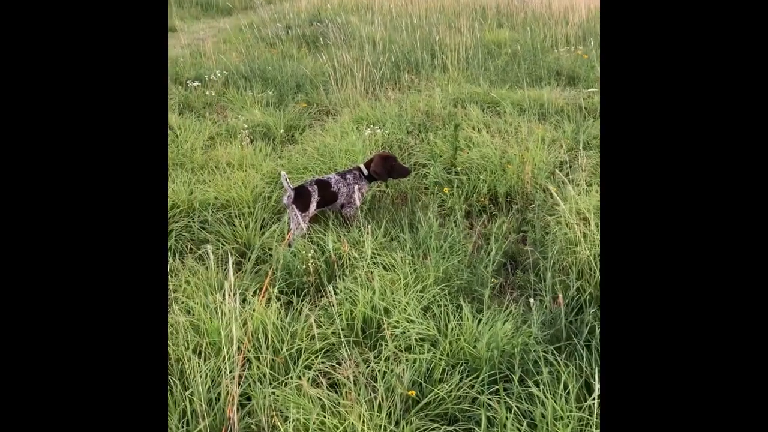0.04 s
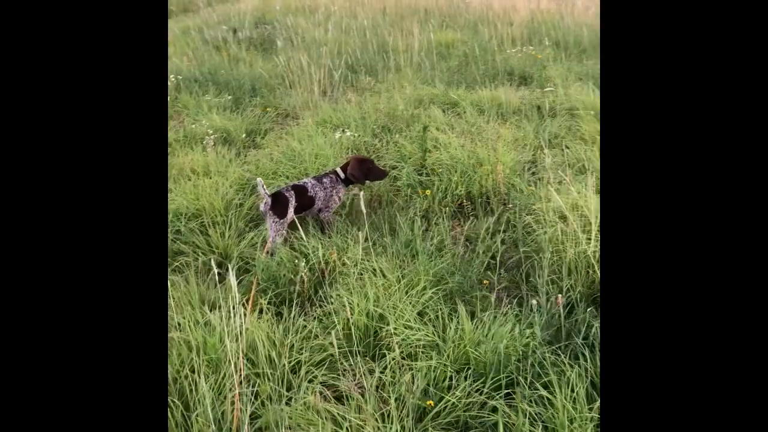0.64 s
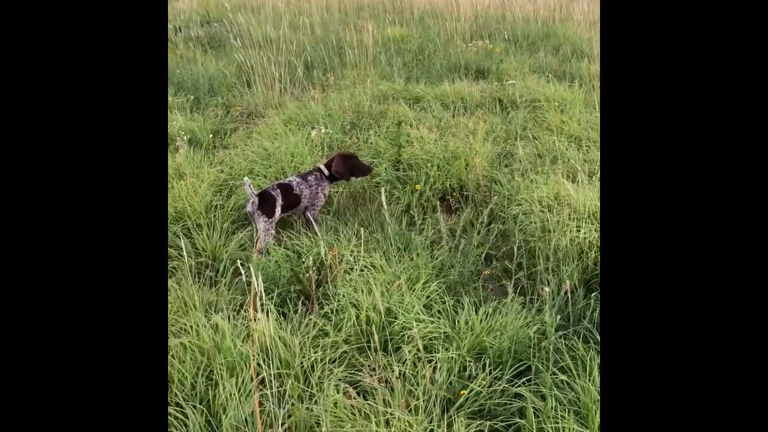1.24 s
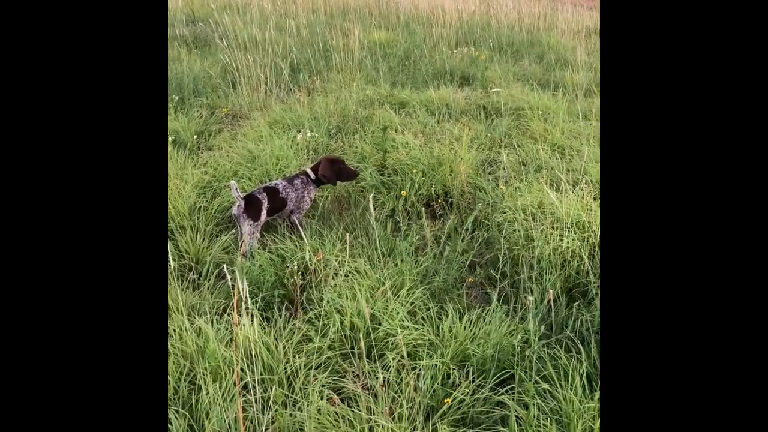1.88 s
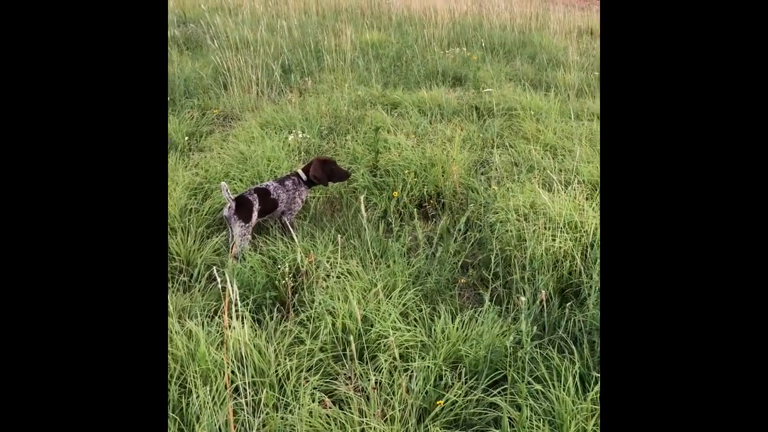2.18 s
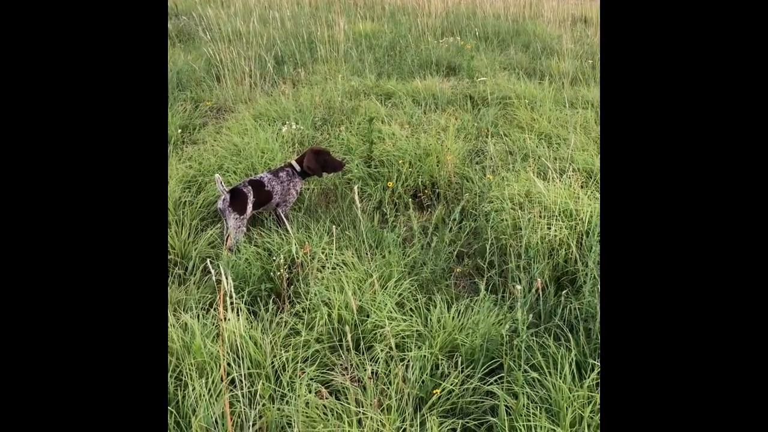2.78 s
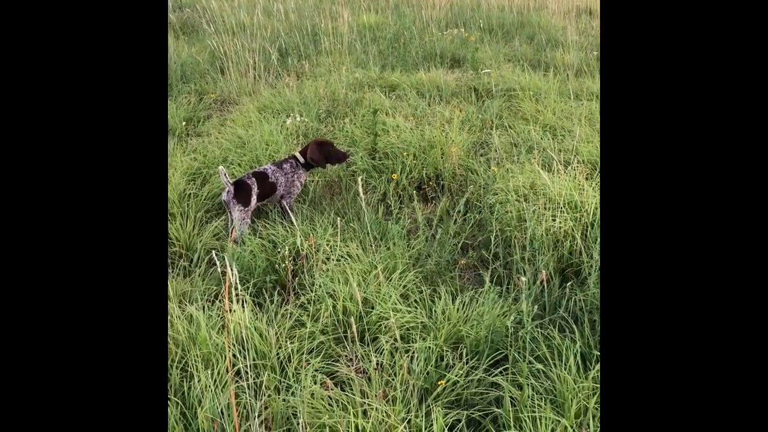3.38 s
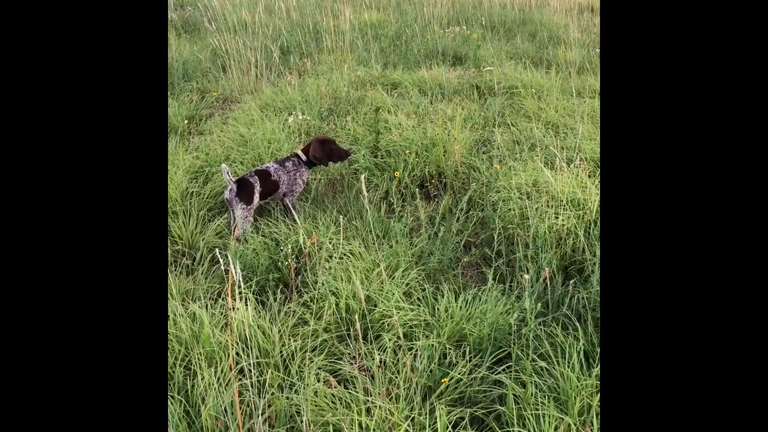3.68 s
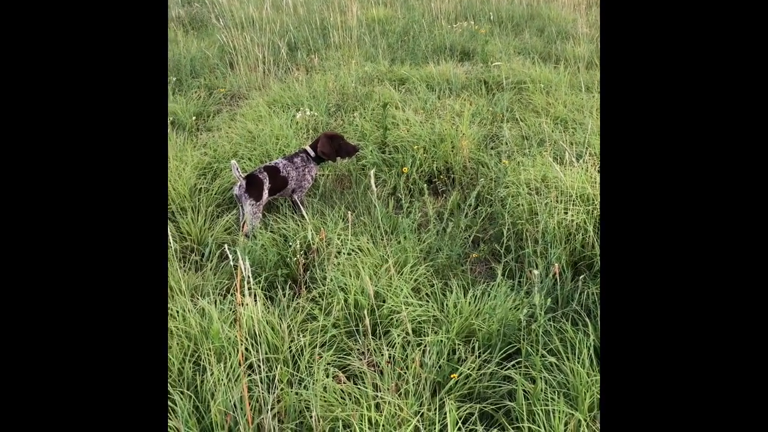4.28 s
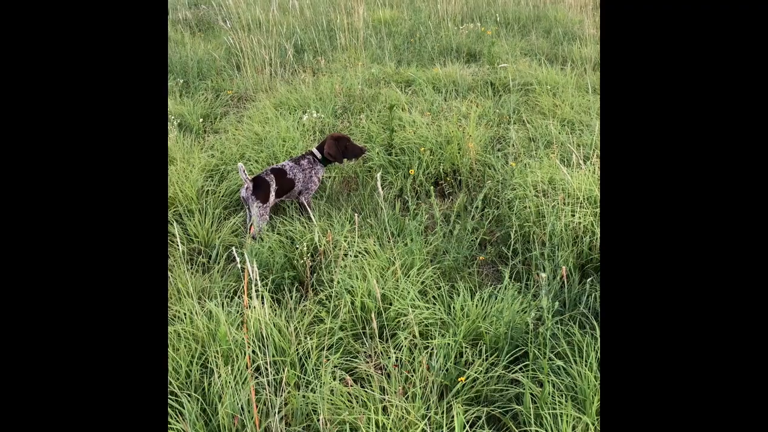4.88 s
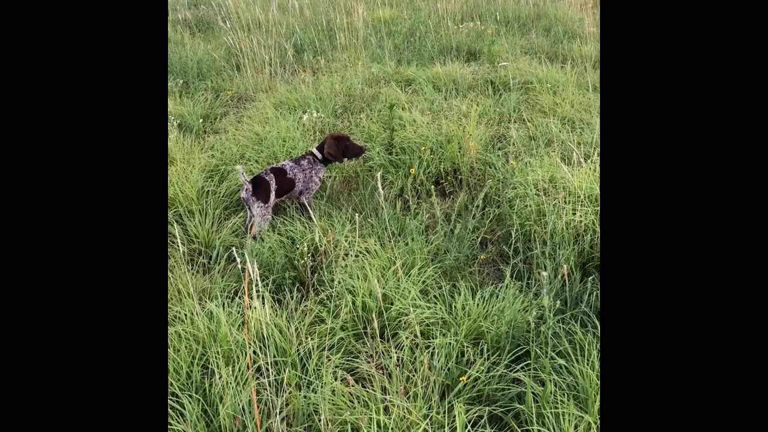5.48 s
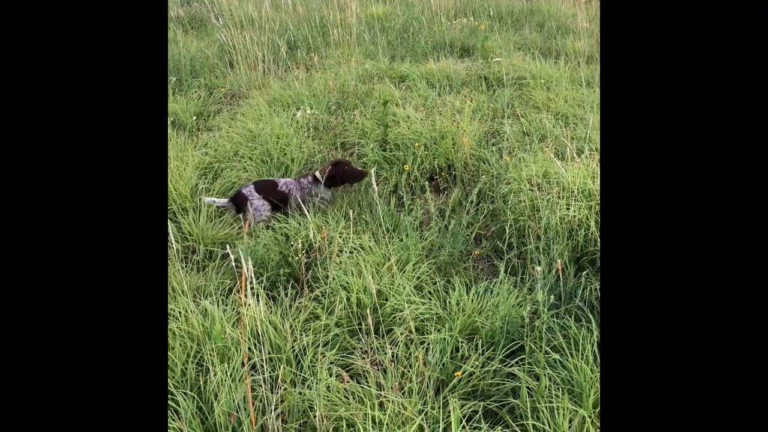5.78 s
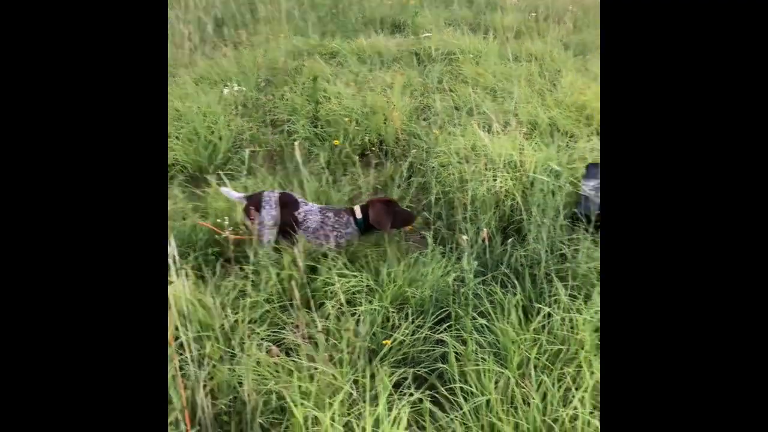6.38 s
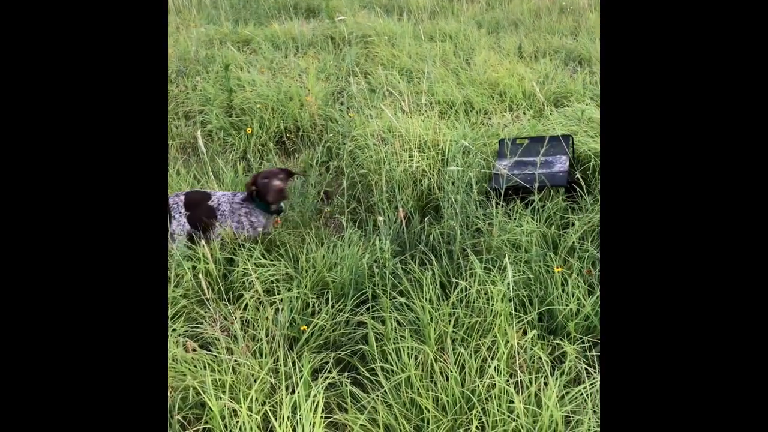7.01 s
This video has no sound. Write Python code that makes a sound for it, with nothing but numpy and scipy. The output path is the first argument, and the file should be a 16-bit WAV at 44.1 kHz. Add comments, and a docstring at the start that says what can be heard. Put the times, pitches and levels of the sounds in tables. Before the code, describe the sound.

Grass swishes softly and a few stems snap as a dog steps through an open meadow, then stops, leaving faint birdsong and a low, distant engine hum. Suddenly a metal launcher scrapes off its latch and bangs open, ringing briefly. Wing flaps follow, mixed with quicker rustling and a string of short, high dog whimpers and yips, until a single sharp pistol crack ends it with a brief hiss.

```python
"""A field of tall grass, with songbirds and an idling engine far off. A young pointer creeps in,
blades swishing and stems snapping. A spring launcher scrapes off its latch and slams open, its sheet
steel ringing; the thrown bird claps away on its wings, and the dog lunges through the grass with thin
whines that break into yips. At the very end a blank pistol cracks and the grass scatters it as hiss."""
import sys
import numpy as np
from scipy import signal
from scipy.fft import rfft, irfft, next_fast_len
from scipy.io import wavfile
from scipy.ndimage import map_coordinates

SR = 44100
rng = np.random.default_rng(int(sys.argv[2]) if len(sys.argv) > 2 else 0)


def generate_wav(signal):
    """Clip the signal to [-1, 1] and save it as 16-bit WAV at the path in sys.argv[1]."""
    frames = np.transpose(np.atleast_2d(signal))
    scaled = np.clip(frames, -1, 1) * 32767
    pcm = np.round(scaled).astype(np.int16)
    wavfile.write(sys.argv[1], SR, pcm)


N = 315125
T = np.arange(N) / SR

# hits of the launcher's latch, doors and frame: t/s, relative level/dB, t60/s, tilt/(dB per octave)
LAUNCHER_HITS = [(5.459, -57.5, 0.054, -6.5), (5.4951, -38.5, .07, -3.5), (5.519, -26.5, 0.081, 0),
                 (5.532, -23, 0.15, -1.5), (5.554, -25.5, 0.058, 2.5), (5.575, -32, 0.34, -0.5),
                 (5.620, -32.5, 0.062, 0.5), (5.6523, -11, 0.078, 2.14), (5.7243, -36.5, 0.098, -3.5),
                 (5.79, -33.5, 0.067, -0.5)]
# ringing modes of its sheet steel and frame: f/Hz, width/Hz, gain/dB
STEEL_MODES = [(1353, 24, -6), (1500, 16, -3), (1593, 13, 1), (1655, 15, 1), (1850, 30, -4),
               (1955, 30, -1.5), (2820, 27, -1.5), (3820, 26, 2), (3992, 22, 4), (4105, 20, 5),
               (5170, 30, 1.5), (5610, 22, 3), (6270, 28, -1.5), (7240, 32, 1), (7270, 35, 0),
               (7630, 30, 4.5), (7729, 22, -1), (8040, 35, -3), (9010, 40, 3), (9160, 35, 3),
               (9870, 35, 1.5), (11000, 35, 1.5), (11600, 40, -2), (12615, 32, 2), (14960, 40, 3),
               (14950, 40, 4), (15100, 55, 2)]
# tone of steel on steel and of the sliding latch: f/Hz, level/dB
CLANG_EQ = [(59, -41), (100, -12), (547, -13.5), (768, -14), (1330, -2.5), (1830, -4.5), (2690, -6),
            (3700, -3), (6700, -4), (7450, -2.5), (13200, -9.5), (15000, -9), (16000, -18.5)]
LATCH_EQ = [(500, -23), (1100, -11), (1900, 4.5), (2700, -10), (4200, -12), (7000, -22), (16000, -38)]

# tone of the pistol's blast, its bounce off the turf and its scatter from the grass: f/Hz, level/dB
BLAST_EQ = [(40, -21), (150, -16), (500, -1.5), (1900, -1), (4000, -4), (8000, -7), (11000, -12),
            (16000, -21)]
BOUNCE_EQ = [(40, 1), (100, 1.5), (220, -2.5), (500, -20), (1000, -25), (3000, -37), (16000, -53)]
SCATTER_EQ = [(100, -9), (1000, -5), (3300, 0), (6200, 1.5), (9000, -2.5), (12000, -13), (16000, -15)]

# the dog's whimpers: t/s, time to the break/s, start f/Hz, end f/Hz, yip f/Hz, whine level/dB,
# yip level/dB, yip t60/s, second partial/dB, third partial/dB, rasp/(0 to 1)
WHIMPERS = [(5.925, 0.039, 833, 815, 1040, -45.5, -32, 0.13, -2, 3, 0.42),
            (6.255, 0.048, 918, 958, 965, -30.5, -38, 0.12, -10.5, -21.5, 0.08),
            (6.503, 0.063, 800, 875, 940, -28, -33.5, 0.16, -10.5, -23.5, 0.24),
            (6.62, 0.11, 927, 1015, 888, -47.5, -37, 0.18, -18, -30, 0.33),
            (6.745, 0.0374, 927, 1010, 875, -49, -45, 0.24, -17, -18, 0.3),
            (6.911, 0.047, 854, 835, 938, -29, -33, 0.23, -17, -26, 0.87),
            (7.035, 0.046, 952, 1169, 954, -36.5, -37, 0.21, -5, -34, 0.75)]
# tone of the rasp in its voice: f/Hz, level/dB
RASP_EQ = [(500, -48), (800, 7), (1000, -3), (1800, 0), (2600, -1.5), (3000, -25), (5000, -28.5)]

# wing claps: t/s, relative level/dB, tilt/(dB per octave)
WINGBEATS = [(5.775, -38.5, 3), (5.830, -28, -1.5), (5.874, -38.5, -3), (5.94, -36.5, -2), (6.384, -40, -2),
             (6.499, -47.5, -1), (6.612, -40, -1), (6.728, -37, -0.5), (6.845, -43.5, -2)]
# tone of a clap: f/Hz, level/dB
CLAP_EQ = [(100, -7), (350, -4.5), (800, -7.5), (1800, -3), (4000, -3.5), (8000, -6.5), (16000, -19)]

# the dog's strides, creeping then lunging: peak t/s, swish level/dB, crunch level/dB, rise/s, fade/s
STRIDES = [(.43, -66.5, -88, 0.23, 0.094), (0.561, -51.5, -59.5, 0.074, 0.15),
           (.645, -52, -60, 0.083, 0.037), (.755, -57, -65.5, 0.072, 0.099), (.95, -61, -64, 0.071, 0.086),
           (1.125, -53, -67, 0.067, 0.21), (1.44, -54, -59.5, 0.098, 0.08), (1.76, -65.5, -69, 0.24, 0.26),
           (5.94, -48, -55, 0.23, 0.19), (6.13, -48, -61, 0.14, .13), (6.25, -39.5, -57, 0.082, .035),
           (6.37, -48, -58, 0.095, 0.12), (6.545, -47, -60, 0.052, 0.061), (6.75, -60, -61, 0.096, 0.18),
           (6.97, -57, -60.5, 0.018, 0.13)]
# stems snapping: t/s, peak level/dB, tilt/(dB per octave)
SNAPS = [(0.196, -46.5, -1), (.646, -32, -5), (.694, -34, 2.5), (.791, -31.5, -6), (.867, -34.5, -0.5),
         (1.445, -30, -2.5), (1.713, -38.5, -3.5), (1.855, -42, -6), (2.472, -43, 3), (5.257, -38.5, -2.5),
         (6.417, -23.5, 7), (7.082, -29, 5)]
# tone of a fast brush, a duller slow brush, stalks underfoot and a snapping stem: f/Hz, level/dB
FAST_SWISH_EQ = [(180, -25.5), (300, -6.5), (392, -6.5), (470, -14.5), (1010, 2), (1140, -2), (1580, -3),
                 (2880, -3.5), (15000, 2), (16000, -11)]
SLOW_SWISH_EQ = [(180, -26), (350, 2.5), (700, -5.5), (1200, -7.5), (2500, 0.5), (4500, 0), (9000, -7),
                 (12500, -22), (16000, -12)]
CRUNCH_EQ = [(60, -9.5), (180, 2), (550, -0.5), (1200, -4), (2500, -8), (6000, -38)]
STEM_EQ = [(150, -13), (400, -3), (900, -0.5), (1800, -1.5), (4500, 2.5), (8000, -6), (16000, -15)]

# songbird whistles: t/s, length/s, start f/Hz, end f/Hz, level/dB
WHISTLES = [(0, .13, 2810, 2170, -64.5), (.387, 0.18, 3120, 3040, -68), (0.402, 0.14, 2600, 2050, -65),
            (0.691, 0.078, 2630, 2320, -64), (0.936, .1, 3380, 2480, -68), (0.974, .06, 2520, 2390, -64),
            (1.028, 0.084, 2505, 2090, -61), (1.164, 0.042, 2390, 2150, -61.5),
            (1.536, .077, 2420, 3000, -69), (1.61, 0.057, 3100, 2560, -67), (1.699, .13, 2900, 2330, -68),
            (2.124, 0.046, 2560, 2275, -63.5), (2.225, 0.17, 3250, 2290, -72.5),
            (1.784, .022, 5100, 4900, -66), (2.148, 0.1, 4720, 4250, -77), (2.512, 0.15, 4080, 3880, -75.5),
            (3.493, 0.087, 3260, 3190, -74.5), (3.811, 0.05, 2460, 1950, -71.5),
            (3.879, .05, 2320, 2540, -71), (4.763, .045, 3460, 3300, -74), (2.779, .17, 3410, 2330, -72),
            (3.275, 0.15, 3320, 2316, -62), (3.61, 0.18, 1810, 1837, -65), (3.732, 0.082, 2490, 2960, -68),
            (3.988, 0.0273, 3030, 2640, -61), (4.043, 0.03, 1717, 1564, -67.5),
            (4.073, 0.03, 3100, 2630, -59), (4.14, 0.049, 3260, 3060, -63.5),
            (4.798, 0.038, 3020, 2120, -68), (4.877, .13, 2890, 2470, -69.5),
            (5.207, 0.074, 2704, 2256, -60.5), (5.386, 0.1, 2250, 2020, -71), (6.407, 0.1, 2625, 2275, -59),
            (6.74, 0.11, 4350, 3860, -72)]
# raspy chips: t/s, centre f/Hz, level/dB
CHIPS = [(1.77, 4140, -63.5), (2.711, 3590, -64), (3.043, 3430, -72), (3.114, 3130, -68.5),
         (3.181, 3400, -65), (3.842, 3840, -65), (4.138, 3770, -66.5), (5.359, 3950, -58.5)]
# one far bird repeating a low note: t/s
FAR_CALL_TIMES = [1.92, 2.461, 2.997, 4.48, 5.03]
# bands of one long bird buzz: centre f/Hz, swing either way/Hz, level/dB, fade/(dB per s)
BUZZ_BANDS = [(2726, 240, -66.5, 15), (3490, 900, -73.5, 9), (4980, 220, -79, 6)]

# soft low bumps: t/s, level/dB
BUMPS = [(1.71, -51.5), (2.649, -51)]
# tone of a bump: f/Hz, level/dB
BUMP_EQ = [(25, -14), (55, 7), (110, -1), (200, -18), (500, -55)]
# the engine's hum: multiple of the firing rate, level/dB
ENGINE_HARMONICS = [(4, -68.5), (5, -83.5), (6, -66), (8, -75.5), (9, -82.5), (10, -68.5), (11, -81),
                    (12, -84)]
# tone of the outdoor air: f/Hz, level/dB
AIR_EQ = [(15, -39), (25, -22.5), (61, 0), (92, -4), (157, -6), (200, -9.5), (317, -13.5), (1020, -20),
          (1230, -19.5), (1940, -22.5), (2550, -25.5), (3430, -24), (6740, -34), (14800, -39.5),
          (16000, -43.5)]


def launcher():
    """The latch scrapes along its catch, then each hit of chattering steel sets sheet and frame ringing."""
    chatter, t = np.zeros(N), T[:SR // 3]
    for s, db, t60, tilt_db in LAUNCHER_HITS:
        contacts = rng.standard_normal(len(t)) * amp(0.52 * drift(len(t), 900))
        envelope = (1 - np.exp(-t / 0.00027)) * amp(-60 * np.maximum(t - .005, 0) / t60)
        add(chatter, s, amp(db) * envelope * colour(contacts, CLANG_EQ, tilt_db, knee_hz=1600))
    ring = sum(amp(db) * signal.lfilter(*signal.iirpeak(hz, hz / width, SR), chatter)
               for hz, width, db in STEEL_MODES)
    scrape_at, scrape_s, ramp_s = 5.457, .068, 0.006
    sliding = np.clip(np.minimum(T - scrape_at, scrape_at + scrape_s - T) / ramp_s, 0, 1)
    scrape = amp(-47) * sliding * colour(grains(per_s=4600, spread_db=3), LATCH_EQ)
    return amp(-2) * chatter + amp(-3) * ring + scrape


def pistol():
    """One sharp blast, a dull bounce off the ground, then hiss scattered by the grass near and far."""
    shot_at = 7.1031
    out, blast = np.zeros(N), click(BLAST_EQ)
    start, since = shot_at - len(blast) / 2 / SR, T - shot_at
    add(out, start, amp(5) * blast)
    add(out, start + .0095, amp(-17.5) * click(BOUNCE_EQ))
    near = amp(-27 - 60 * abs(since) / 0.023) * (since > 0)
    far = amp(-30) * swell(shot_at + 0.031, rise_s=.015, fade_s=0.022) * (since > 0.0096)
    return out + (near + far) * colour(rng.standard_normal(N), SCATTER_EQ)


def dog():
    """A thin whine breaks into a yip with overtones and a hoarse rasp, then trails off quavering."""
    break_s, trail_s, quaver_per_s = .004, 0.15, 131.2
    rasp_s, rasp_lag_s, mouth_open_s = 0.015, 0.0097, 0.019
    out, hoarse = np.zeros(N), colour(rng.standard_normal(N), RASP_EQ)
    for s, length, first, last, yip_hz, whine_db, yip_db, t60, second_db, third_db, rasp in WHIMPERS:
        t = T[:int((length + trail_s) * SR)]
        progress, since_break = np.minimum(t / length, 1), np.maximum(t - length, 0)
        broken = 1 - np.exp(-since_break / break_s)  # crossfade from whine to yip
        quaver_hz = yip_hz * (1 + 0.031 * drift(len(t), quaver_per_s))
        hz = first + (last - first) * progress + (quaver_hz - last) * broken
        arch_db = whine_db - 30 * (progress - 0.79) ** 2  # the whine peaks late
        trail_db = yip_db - 60 * since_break / t60 + 4 * drift(len(t), quaver_per_s)
        envelope = amp(arch_db + (trail_db - arch_db) * broken) * signal.windows.tukey(len(t), .05)
        rough = rasp * np.exp(-((t - length - rasp_lag_s) / rasp_s) ** 2)
        # the mouth opens around the break and lets the second partial out; the third drops after it
        mouth = np.exp(-((t - length) / mouth_open_s) ** 2)
        second = amp(second_db - 17 * (1 - mouth))
        third = amp(third_db - 36 * broken)
        jitter = (0.0033 + 0.068 * rough) * drift(len(t), 1200)
        phase = 2 * np.pi * np.cumsum(hz * (1 + jitter)) / SR
        voice = np.sqrt(2) * (np.sin(phase) + second * np.sin(2 * phase) + third * np.sin(3 * phase))
        add(out, s, envelope * (voice * (1 - rough / 2) + rough * np.interp(s + t, T, hoarse)))
    return meadow(out, wet_db=-18, t60=0.39)


def wings():
    """The wings slap together at the top of each stroke; a softer flick of feathers follows."""
    out, t = np.zeros(N), T[:SR // 12]
    for s, db, tilt_db in WINGBEATS:
        for delay, layer_db, t60 in [(0, 3, 0.028), (.011, -5.5, 0.021)]:  # slap, flick
            envelope = (1 - np.exp(-t / 0.00029)) * amp(-60 * t / t60)
            feathers = colour(rng.standard_normal(len(t)), CLAP_EQ, tilt_db)
            add(out, s + delay, amp(db + layer_db) * envelope * feathers)
    return out


def grass():
    """Blades brush in a fine crackle that brightens with speed, and stalks crunch underfoot."""
    pushes = [(swish_db, crunch_db, swell(s, rise, fade))
              for s, swish_db, crunch_db, rise, fade in STRIDES]
    # the launcher shakes the turf until it comes to rest
    jolt = swell(5.55, rise_s=0.012, fade_s=0.21) * (T < 5.87)
    pushes.append((-44.5, -42, jolt))
    speed = np.sqrt(sum((amp(db) * push) ** 2 for db, _, push in pushes))
    weight = np.sqrt(sum((amp(db) * push) ** 2 for _, db, push in pushes))
    blades = unit(grains(per_s=8000, spread_db=3) + 0.94 * rng.standard_normal(N))
    bright = np.clip(np.sqrt(speed / amp(-43.5)), 0, 1)
    swish = bright * colour(blades, FAST_SWISH_EQ) + (1 - bright) * colour(blades, SLOW_SWISH_EQ)
    swish *= amp(1.4 * drift(N, 60))
    crunch = colour(grains(per_s=2500, spread_db=5), CRUNCH_EQ) * amp(2 * drift(N, 45))
    return swish * speed + crunch * weight


def stems():
    """Single stems snap: a hard click with a short noisy tail."""
    out, t = np.zeros(N), T[:SR // 20]
    for s, db, tilt_db in SNAPS:
        pulse = click(STEM_EQ, tilt_db)
        add(out, s - len(pulse) / 2 / SR, amp(db) * pulse)
        tail = colour(rng.standard_normal(len(t)), STEM_EQ, tilt_db)
        add(out, s, amp(db - 17.5 - 60 * t / 0.034) * tail)
    return out


def songbirds():
    """Pure whistles, chips and buzzes made of repeated down-sweeps, and a faint chorus beyond."""
    out = np.zeros(N)
    for s, length, first_hz, last_hz, db in WHISTLES:
        add(out, s, amp(db) * whistle(length, first_hz, last_hz))
    for s, centre_hz, db in CHIPS:
        add(out, s, amp(db) * trill(.029, centre_hz, swing_hz=460, per_s=120))
    for s in FAR_CALL_TIMES:
        add(out, s, amp(-77.5) * whistle(0.17, first_hz=2180, last_hz=1680))
    for centre_hz, swing_hz, db, fade in BUZZ_BANDS:
        add(out, 4.195, amp(db) * trill(0.55, centre_hz, swing_hz, per_s=59, fade_db_per_s=fade))
    add(out, 1.92, amp(-75.5) * trill(0.33, centre_hz=3980, swing_hz=220, per_s=27))  # one slow trill
    chorus_notes, low_hz, high_hz, longest_s = 34, 2266, 3460, 0.16
    for k, (when, span, height, fall) in enumerate(rng.random((chorus_notes, 4))):
        hz = low_hz + (high_hz - low_hz) * height
        note = whistle(longest_s * (1 + span) / 2, hz, hz * (1 - .17 * fall))
        add(out, (k + when) / chorus_notes * T[-1], amp(-78.5) * note)
    return meadow(out, wet_db=-8, t60=.45)


def whistle(length, first_hz, last_hz):
    """One pure bird note that glides fast at first, then levels off and fades; rms 1."""
    settle_s, fade_db = .1, 3.5
    progress = np.linspace(0, 1, int(length * SR))
    glide = np.expm1(-progress * length / settle_s) / np.expm1(-length / settle_s)
    hz = (first_hz + (last_hz - first_hz) * glide) * (1 + 0.0041 * drift(len(progress), 160))
    level_db = 2 * drift(len(progress), 50) - fade_db * progress
    envelope = signal.windows.tukey(len(progress), .28) * amp(level_db)
    return unit(envelope * np.sin(2 * np.pi * np.cumsum(hz) / SR))


def trill(length, centre_hz, swing_hz, per_s, fade_db_per_s=0):
    """A bird's run of quick down-sweeps, each one a pulse; rms 1."""
    t = T[:int(length * SR)]
    cycle = (t * per_s) % 1
    hz = centre_hz + swing_hz * (1 - 2 * cycle + 0.45 * drift(len(t), 900))
    envelope = signal.windows.tukey(len(t), .15) * np.sin(np.pi * cycle) * amp(-fade_db_per_s * t)
    return unit(envelope * np.sin(2 * np.pi * np.cumsum(hz) / SR))


def bumps():
    """Short dull thuds, low in the mix."""
    out, t = np.zeros(N), T[:SR // 4]
    for s, db in BUMPS:
        envelope = amp(db - 60 * t / 0.3) * (1 - np.exp(-t / 0.0049))
        add(out, s, envelope * colour(rng.standard_normal(len(t)), BUMP_EQ))
    return out


def engine():
    """A far engine throbs at idle: harmonics of a slightly uneven firing rate."""
    out, firing_hz = np.zeros(N), 14.5
    firings = np.cumsum(firing_hz * (1 + 0.01016 * drift(N, 3.7))) / SR
    for multiple, db in ENGINE_HARMONICS:
        gain = np.sqrt(2) * amp(db + 1.9 * drift(N, 3.3))
        out += gain * np.sin(2 * np.pi * (multiple * firings + rng.random()))
    return out


def air():
    """A gently wavering bed of outdoor air, its level set by the part above the rumble."""
    bed = colour(rng.standard_normal(N), AIR_EQ)
    above_rumble = signal.sosfilt(signal.butter(4, 300, "high", fs=SR, output="sos"), bed)
    return bed * amp(-68.5 + .5 * drift(N, 6.5)) / above_rumble.std()


def meadow(x, wet_db, t60):
    """Adds a diffuse reverb tail from grass and far trees."""
    t = T[:SR // 2]
    tail = rng.standard_normal(len(t)) * amp(-60 * t / t60) * (t > .008)
    return x + amp(wet_db) * signal.oaconvolve(x, tail / np.linalg.norm(tail))[:N]


def amp(db):
    """Decibels to gain."""
    return 10 ** (np.asarray(db) / 20)


def unit(x):
    """Scales to rms 1."""
    return x / np.sqrt(np.mean(x ** 2) + 1e-20)


def add(mix, s, sound):
    """Lays a sound into the mix at s seconds."""
    part = mix[max(round(s * SR), 0):][:len(sound)]
    part += sound[:len(part)]


def colour(x, eq, tilt_db=0, knee_hz=400):
    """Shapes x with an EQ curve, tilted by dB per octave above the knee; rms 1."""
    size = next_fast_len(len(x))
    octave = np.log2(np.fft.rfftfreq(size, 1 / SR) + 1)
    hz, db = np.transpose(eq)
    gain = amp(np.interp(octave, np.log2(hz + 1), db) + tilt_db * np.maximum(octave, np.log2(knee_hz)))
    return unit(irfft(rfft(x, size) * gain, size)[:len(x)])


def drift(size, per_s):
    """A random modulator that glides to a new value per_s times a second."""
    knots = rng.standard_normal(4096)
    return map_coordinates(knots, [np.arange(size) * per_s / SR], order=1, mode="wrap")


def grains(per_s, spread_db):
    """A crackle of random clicks, mostly small and a few large; rms 1."""
    clicks = rng.standard_normal(N) * (rng.random(N) < per_s / SR)
    return unit(clicks * amp(spread_db * np.minimum(rng.exponential(1, N), 4)))


def click(eq, tilt_db=0, size=2048):
    """One coloured pressure pulse of peak 1, centred in its window."""
    pulse = colour(signal.unit_impulse(size, "mid"), eq, tilt_db)
    return pulse / abs(pulse).max()


def swell(s, rise_s, fade_s):
    """An envelope that grows smoothly to 1 at time s, then dies away."""
    return np.exp(-np.where(T < s, ((s - T) / rise_s) ** 2, (T - s) / fade_s))


def scene():
    """The action over the field's ambience, in mono."""
    ambience = air() + engine() + bumps() + songbirds()
    return (ambience + grass() + stems() + launcher() + wings() + dog() + pistol())[None]


def record(dry):
    """The microphone's filters delay the lows more than the highs, cut the rumble and trim the top."""
    low_cut_hz, high_cut_hz = 34, 16200
    size = next_fast_len(N + SR)
    hz = np.fft.rfftfreq(size, 1 / SR)
    lag = np.exp(-2j * np.pi * 1.1 * np.log((hz + 60) / (hz + 6000)))
    heard = irfft(rfft(dry, size) * lag, size)[:, :N]
    heard = signal.sosfilt(signal.butter(3, low_cut_hz, "high", fs=SR, output="sos"), heard)
    high_cut = signal.firwin(511, high_cut_hz, window=("kaiser", 9), fs=SR)
    return signal.oaconvolve(heard, high_cut[None], "same")


dry = scene()
out = record(dry)
generate_wav(out)
```